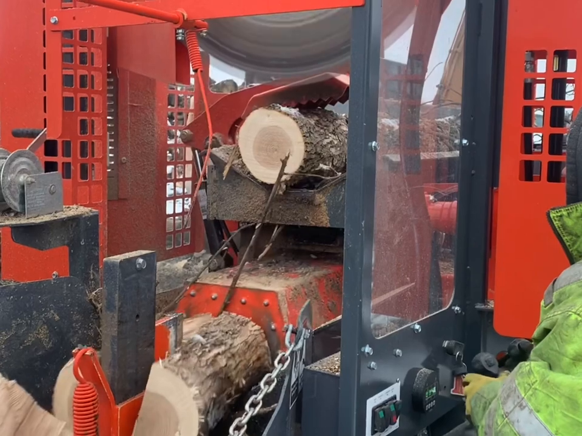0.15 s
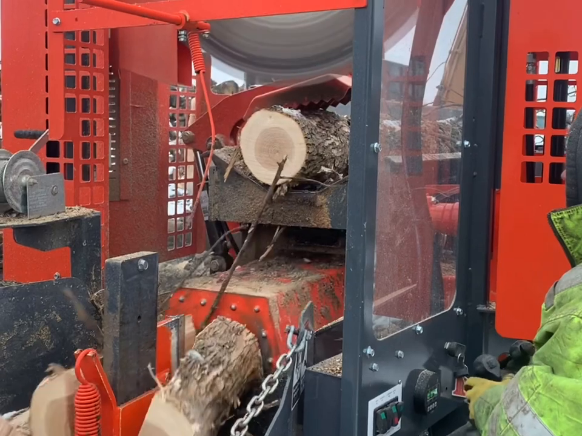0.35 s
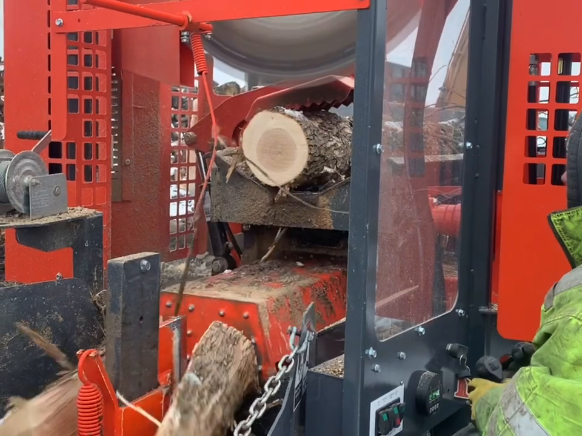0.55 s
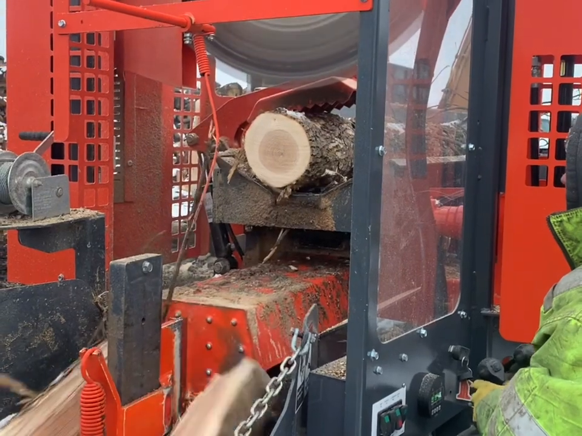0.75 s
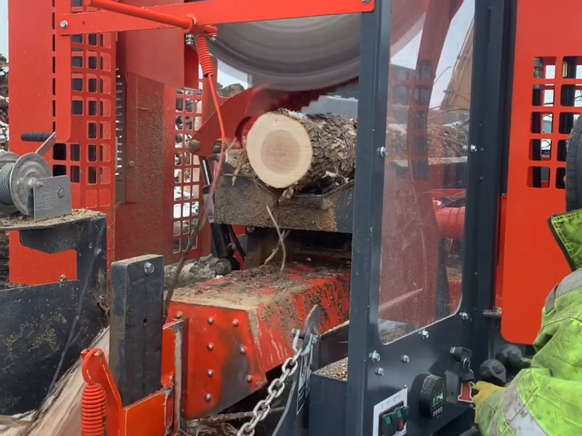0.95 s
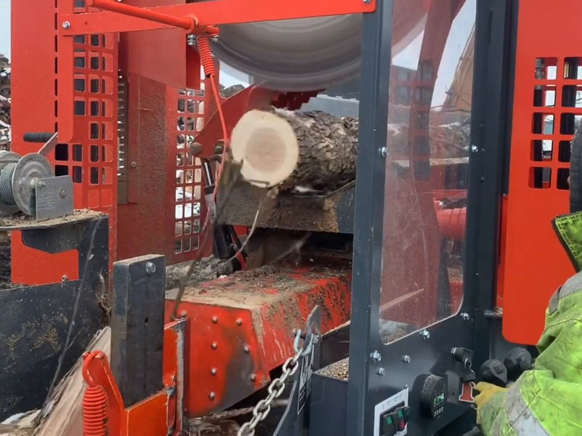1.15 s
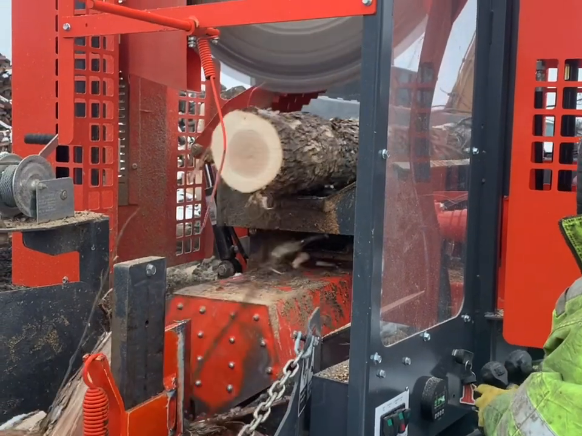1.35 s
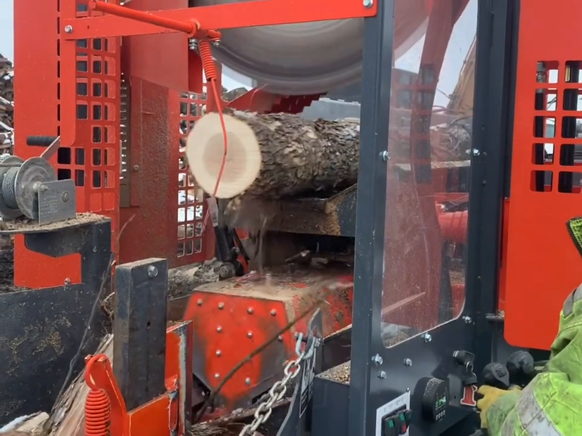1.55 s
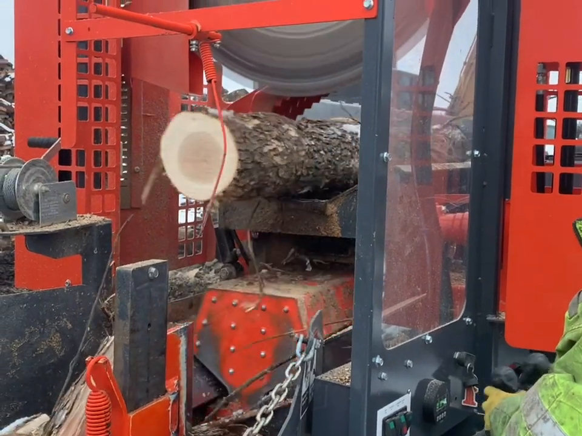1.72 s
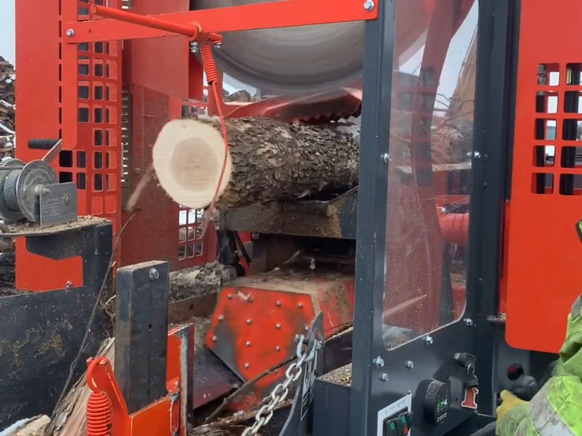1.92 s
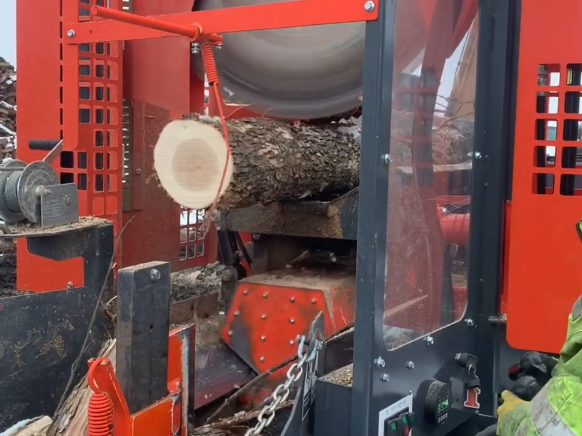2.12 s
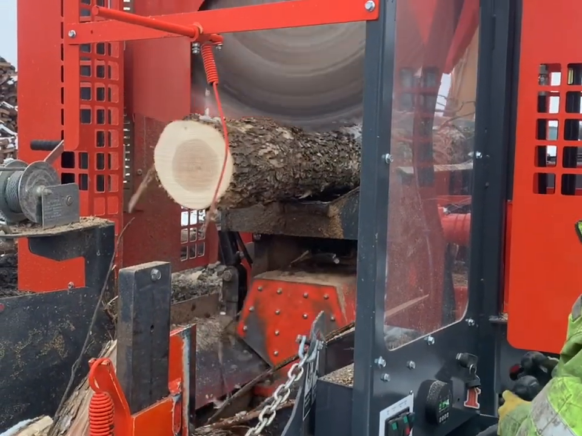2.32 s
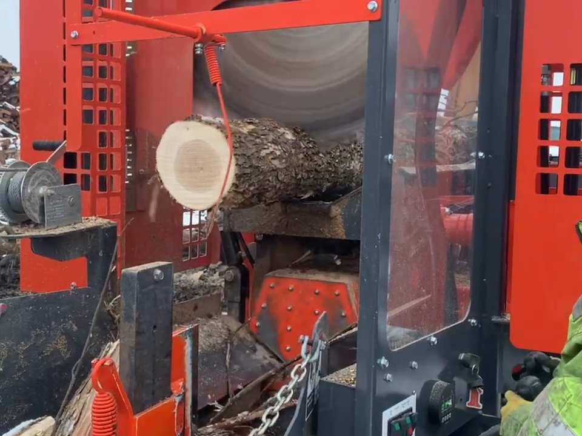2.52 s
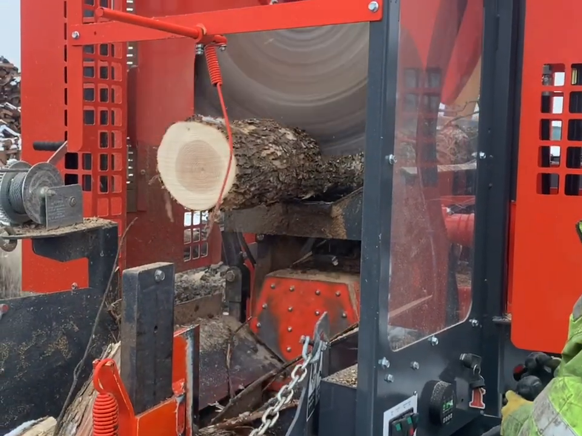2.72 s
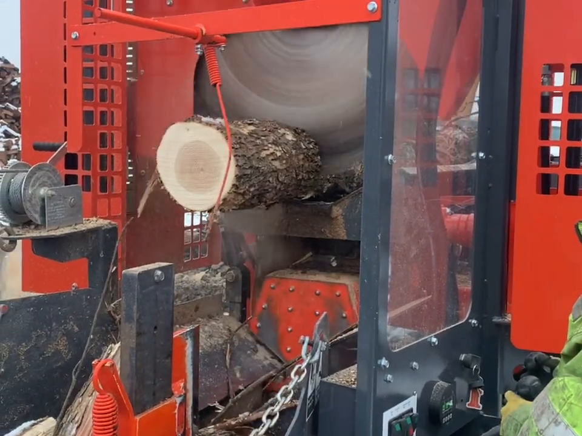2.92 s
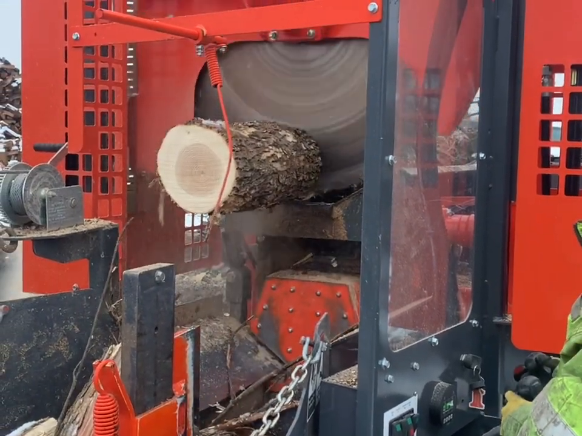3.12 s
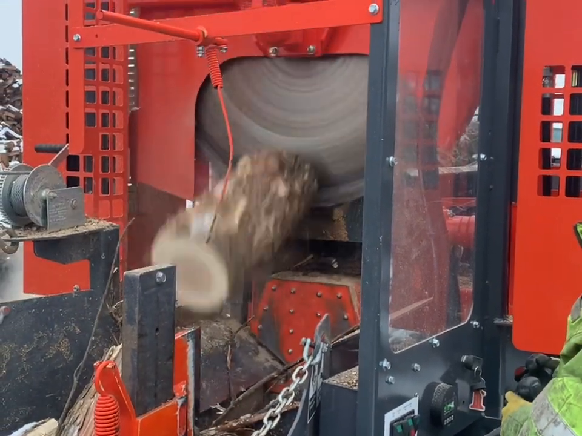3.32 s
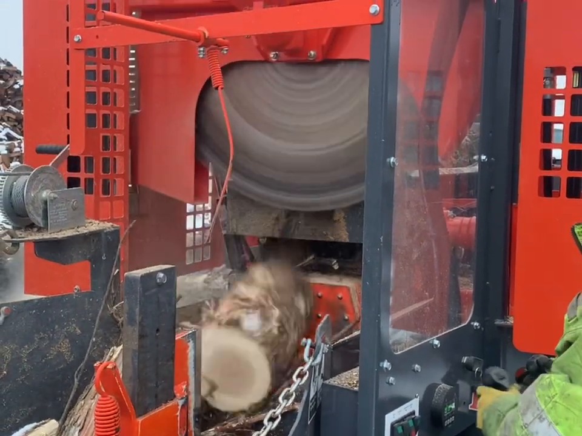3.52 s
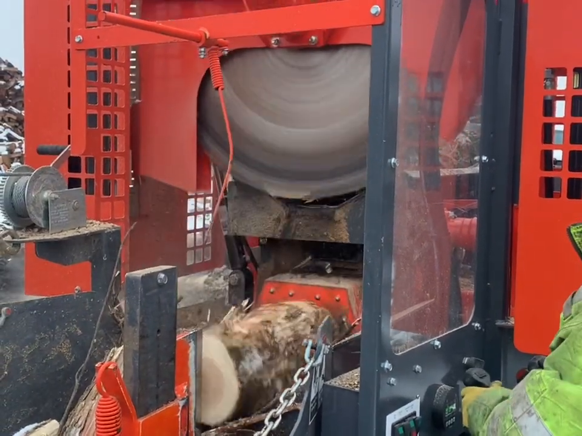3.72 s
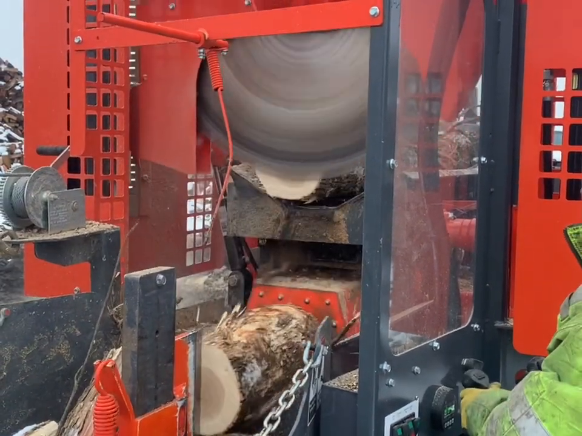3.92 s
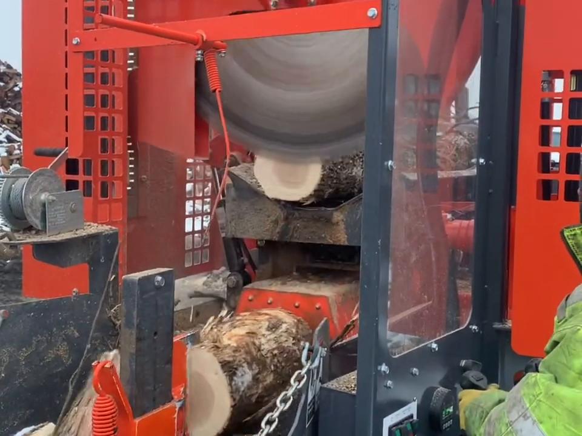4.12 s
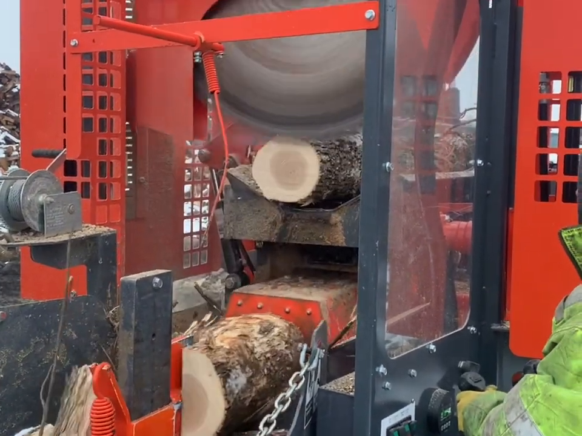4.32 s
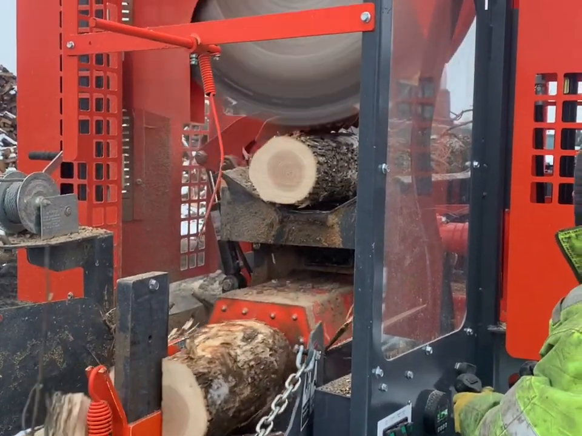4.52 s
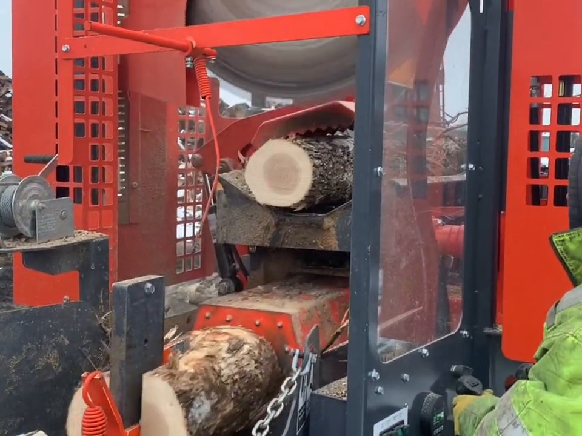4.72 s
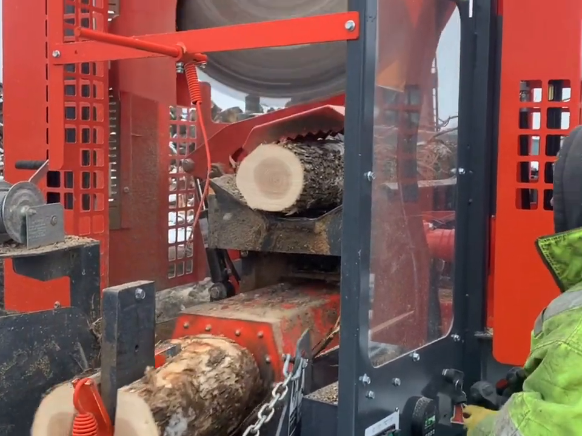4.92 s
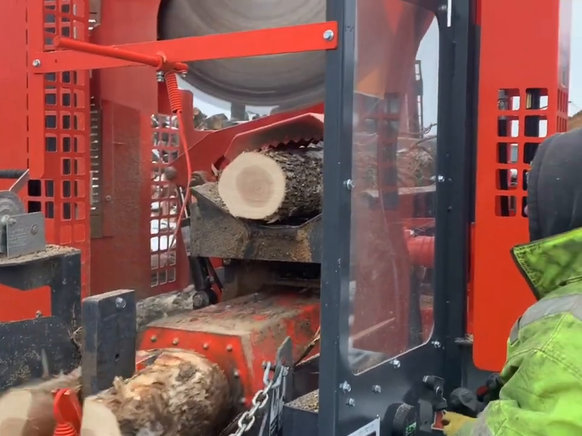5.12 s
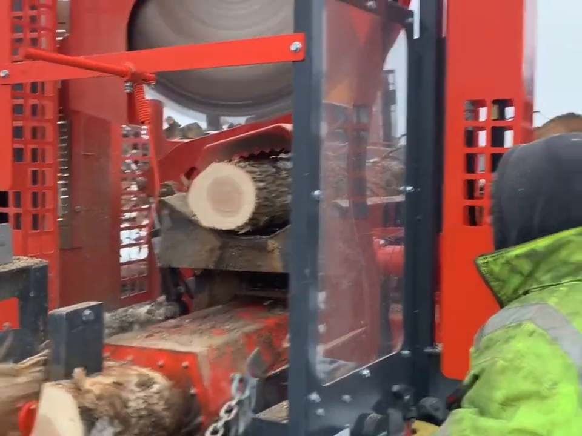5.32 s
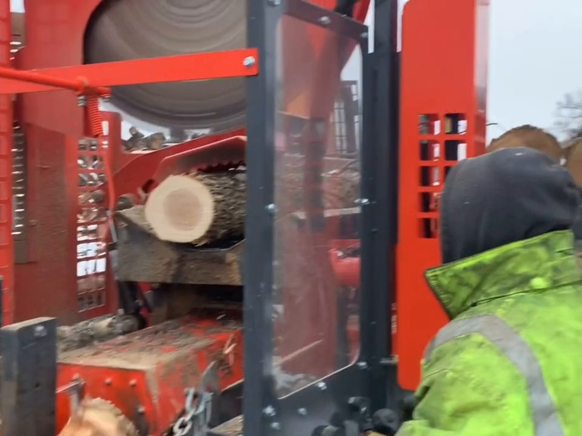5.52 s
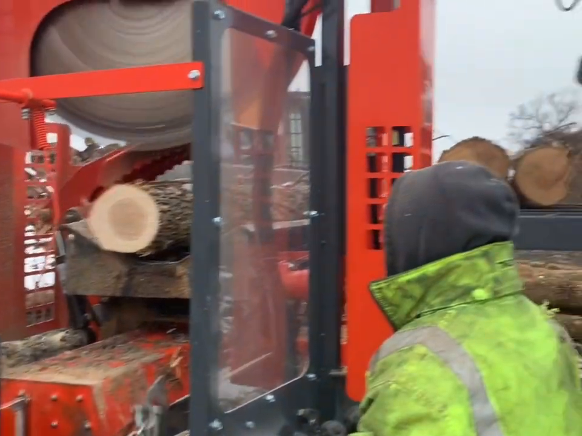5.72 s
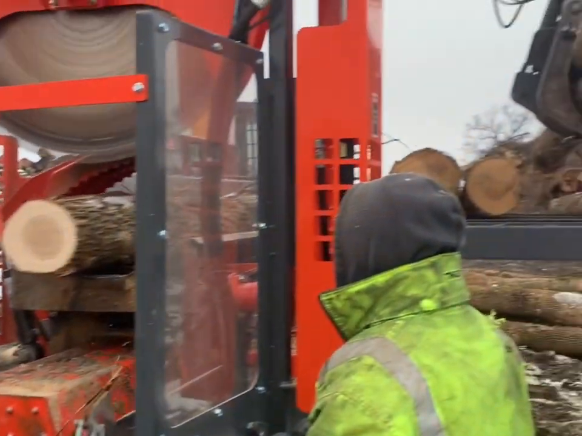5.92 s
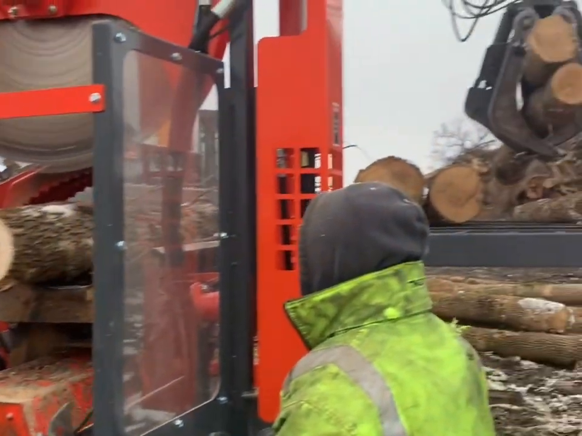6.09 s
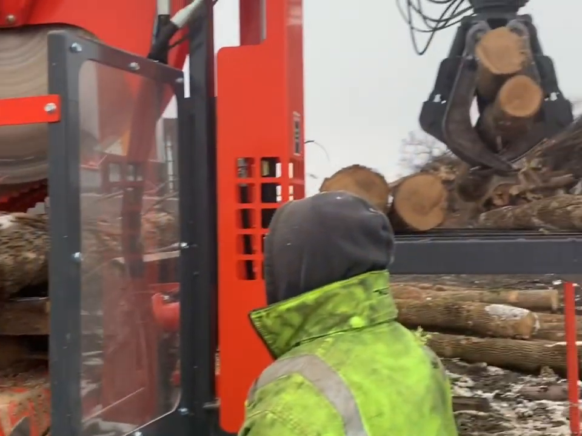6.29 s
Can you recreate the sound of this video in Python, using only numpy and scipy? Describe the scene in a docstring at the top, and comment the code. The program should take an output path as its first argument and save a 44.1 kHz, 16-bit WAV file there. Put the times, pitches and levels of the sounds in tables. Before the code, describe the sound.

A close stereo pickup of a wood-cutting machine outdoors: rough diesel roar, hiss, wavering pump tones and a blade motor's whine throughout. First a clanking bang and bark scrapes, then a one-second saw cut, bright and rasping with ringing blade tones, the engine sagging under load. After the breakthrough, the log drops with hard, ringing steel bangs, ticks and scrapes. The motor spins up again and wood tumbles with late thuds.

```python
"""A diesel engine drones and sags under load as it drives a firewood processor in an open yard: crank orders,
a pulsing noise roar, hiss and pump tones. A hydraulic motor whines as it spins a large circular blade, which
slows and rasps through one log as noise, torn-chip clicks and plate resonances. Logs and the ram bang on the
steel trough as noise contacts ringing modes; bark scrapes as short noise, links tick as noise cracks and squeak
as gliding tones. Two close microphone ports hear it all with a small delay between them."""
import sys
import numpy as np
from scipy import signal
from scipy.fft import rfft, irfft, next_fast_len
from scipy.io import wavfile

SR = 44100
rng = np.random.default_rng(int(sys.argv[2]) if len(sys.argv) > 2 else 0)


def store_wav(level_fs):
    """Save 16-bit WAV to argv[1]."""
    pcm = np.round(np.clip(np.atleast_2d(level_fs), -1, 1) * 32767)
    wavfile.write(sys.argv[1], SR, pcm.T.astype(np.int16))


N = 280035   # samples in the scene


def amp(db):
    """Decibels to gain."""
    return 10 ** (np.asarray(db) / 20)


def rms_one(x):
    """Scale to unit rms."""
    return x / np.sqrt(np.mean(x ** 2) + 1e-20)


def peak_one(x):
    """Scale to unit peak."""
    return x / np.abs(x).max()


def in_time(rows):
    """Table columns as curves over all samples; the first column is the time in seconds."""
    s, *columns = np.transpose(rows)
    return [np.interp(np.arange(N) / SR, s, column) for column in columns]


def at_hz(points, hz):
    """Read a spectrum table on a log frequency axis."""
    point_hz, point_db = np.array(points)[:, 0], np.array(points)[:, 1]
    return np.interp(np.log(hz), np.log(point_hz + 1), point_db)


def phase(hz):
    """Running phase in radians of a tone that follows a frequency curve."""
    return 2 * np.pi * np.cumsum(hz) / SR


def bell(s, spread):
    """A smooth swell around time s."""
    return np.exp(-((np.arange(N) / SR - s) / spread) ** 2)


def drift(rate_hz):
    """Random wander of spread 1: noise through two equal poles at rate_hz, drawn at every 40th sample."""
    r = np.exp(-80 * np.pi * rate_hz / SR)
    noise = rng.standard_normal(N // 40 + 2002)
    slow = signal.lfilter([1], [1, -2 * r, r * r], noise)[2000:]   # drop the filter's start-up
    return np.interp(np.arange(N) / 40, np.arange(len(slow)), rms_one(slow))


def resonance(x, hz, width_hz):
    """Two-pole band-pass with gain 1 on top."""
    r = np.exp(-np.pi * width_hz / SR)
    zeros = np.array([1, 0, -1]) * (1 - r * r) / 2
    poles = [1, -2 * r * np.cos(2 * np.pi * hz / SR), r * r]
    return signal.lfilter(zeros, poles, x)


def coloured(spectrum, patchy_db, shared_db):
    """Noise of the given spectrum, cut into half-octave bands that flicker alone and together; rms 1."""
    size = next_fast_len(N)
    hz = np.fft.rfftfreq(size, 1 / SR) + 1
    shaped = rfft(rng.standard_normal(size)) * amp(at_hz(spectrum, hz))
    band = np.floor(2 * np.log2(np.clip(hz, spectrum[0][0], spectrum[-1][0])))
    bands = (irfft(shaped * (band == k), size)[:N] * amp(patchy_db * drift(4.3)) for k in np.unique(band))
    return rms_one(sum(bands) * amp(shared_db * drift(8.7)))


def swell(rise_ms, fall_ms, hold_ms=0):
    """A smooth rise, a hold and an exponential fall with time constant fall_ms."""
    rise, hold, fall = (max(ms, 0) * SR / 1000 + 2 for ms in (rise_ms, hold_ms, fall_ms))
    up = np.sin(np.linspace(0, np.pi / 2, int(rise))) ** 2
    down = np.exp(-np.arange(int(6 * fall)) / fall)
    return np.concatenate([up, np.ones(int(hold)), down])


def add(out, s, piece):
    """Mix a piece in at time s."""
    i = max(int(s * SR), 0)
    out[i:i + len(piece)] += piece[:N - i]


def struck(rough, modes):
    """A rough contact rings every mode with a strength of its own; peak 1."""
    rings = (amp(db + rng.normal(0, 0.63)) * rms_one(resonance(rough, hz, 0.58 / ring_s))
             for hz, db, ring_s in modes)
    return peak_one(sum(rings))


# The engine sagging under the hydraulic load. Each row: time in seconds, half crank speed in Hz,
# order reference level in dB rms, roar level in dB rms.
ENGINE_RUN = [(0, 21.84, -41.5, -31.5), (.7, 21.83, -38, -30.5), (1.5, 21.76, -40, -30),
              (1.9, 21.75, -37.5, -29), (2.5, 20.99, -32, -32), (2.9, 21.21, -40, -32),
              (3.1, 20.83, -41.5, -30), (3.35, 20.64, -46, -33), (3.47, 20.68, -40, -33.5),
              (3.55, 20.52, -33.5, -34.5), (3.85, 20.31, -38, -29.5), (4.1, 20.34, -34.5, -30),
              (4.35, 21.2, -38, -30.5), (4.7, 21.85, -40, -32), (5.4, 21.85, -36, -30),
              (6.35, 21.6, -38.5, -31)]
# Engine orders. Each row: multiple of half crank speed, level in dB re the reference.
CRANK_ORDERS = [(2, -21), (3, 3), (4, -6), (5, -9.5), (6, -18.5), (7, -8), (9, -14.5), (10, -3), (12, -13)]
# Colour of the roar. Each row: frequency in Hz, density in dB per Hz.
ROAR_SPECTRUM = [(25, -32), (45, -3), (70, -3.5), (120, 3.5), (220, -3.5), (400, -11), (600, -8),
                 (800, -13), (1000, -4.5), (1350, -4), (2000, -12), (2350, -15), (2700, -25.5), (4000, -45)]
# Colour of the fan and valve hiss. Each row: frequency in Hz, density in dB per Hz.
HISS_SPECTRUM = [(1500, -6), (2700, 1.5), (3300, 0), (4700, 0), (5500, -1.3), (6300, -1), (7200, -3.6),
                 (8000, -5.7), (10300, -7.8), (11000, -11), (13500, -14.5), (16000, -18.5)]
# Steady narrow hums of the housing. Each row: frequency in Hz, width in Hz of each of two passes, level in dB rms.
HOUSING_HUMS = [(938, 20.4, -44.5)]
HISS_DB, HISS_FOLLOWS = -39.5, 1   # rms at the roar's mean level; share of the roar's dB swing it follows


def engine():
    """Orders of the crank, each wavering in level, over a roar that pulses with the firing, hums and a hiss."""
    half_crank_hz, tone_db, roar_db = in_time(ENGINE_RUN)
    turn = phase(half_crank_hz)
    orders = sum(amp(db + 2.5 * drift(5.5)) * np.sin(k * turn + 2 * np.pi * rng.random())
                 for k, db in CRANK_ORDERS)
    tones = np.sqrt(2) * amp(tone_db) * orders
    firing = 1 + 0.073 * np.cos(3 * turn)
    roar = amp(roar_db) * firing * coloured(ROAR_SPECTRUM, patchy_db=.9, shared_db=.5)
    hiss_db = HISS_DB + HISS_FOLLOWS * (roar_db - roar_db.mean())
    hiss = amp(hiss_db) * coloured(HISS_SPECTRUM, patchy_db=1.27, shared_db=1.1)
    hums = sum(amp(db) * rms_one(resonance(resonance(rng.standard_normal(N), hz, width), hz, width))
               for hz, width, db in HOUSING_HUMS)
    return tones + hums + roar + hiss


# Pump tones geared to the engine. A plain list of multiples of half crank speed.
PUMP_MULTIPLES = [24, 28, 32, 60]
# The pumps as the valves load them. Each row: time in seconds, then the level of each pump tone in dB rms.
PUMP_LEVELS = [(0, -43.5, -38, -50, -47), (.7, -41.5, -76, -85, -52), (1.2, -45.5, -54, -56, -42),
               (1.5, -60, -48, -54, -45.5), (2.2, -42, -50, -42.5, -62), (2.5, -45, -40, -46, -60),
               (2.9, -43, -43, -51, -51), (3.4, -57, -45, -46, -42), (3.6, -39.5, -46, -64, -78),
               (4.1, -40, -70, -62, -61), (4.4, -42, -39, -58, -48), (4.9, -46, -50, -47, -49),
               (5.4, -44.5, -63, -55, -55), (5.9, -44, -64, -62, -41), (6.35, -59, -59, -46, -43)]
# Two hums that come and go, nearly holding their pitch. Each row: time in seconds, low hum in Hz, its level
# in dB rms, high hum in Hz, its level in dB rms.
FREE_HUMS = [(0, 327, -42, 808, -48), (.7, 327.6, -50.5, 810, -81), (1.5, 321.3, -46, 782, -58),
             (2.2, 320.5, -44.5, 790, -56), (2.45, 327.2, -55, 802, -45), (2.85, 325, -48, 780, -47),
             (3.2, 325.5, -62, 784, -62), (3.5, 319, -43, 776, -61), (3.8, 315, -68, 798, -69),
             (4.2, 320, -53, 800, -51), (4.6, 325.4, -43.5, 790, -49), (5.2, 327.5, -43, 791.6, -62),
             (6.35, 325.8, -46.5, 805, -53)]


def pumps():
    """Clean tones locked to the crank, and two free hums, all wavering a little in level and phase."""
    turn = phase(in_time(ENGINE_RUN)[0])
    low_hz, low_db, high_hz, high_db = in_time(FREE_HUMS)
    turns = [k * turn for k in PUMP_MULTIPLES] + [phase(low_hz), phase(high_hz)]
    levels = in_time(PUMP_LEVELS) + [low_db, high_db]
    tones = (amp(db + 1.9 * drift(8.0)) * np.sin(angle + 0.62 * drift(9.5)) for angle, db in zip(turns, levels))
    return np.sqrt(2) * sum(tones)


# The blade motor, dragged down by the cut and spinning up again. Each row: time in seconds, whine in Hz,
# whine peak level in dB.
MOTOR_RUN = [(0, 646, -40), (1.0, 655, -42.5), (1.4, 646, -43), (2.15, 640.5, -39), (2.3, 631, -41),
             (2.5, 604, -38), (2.6, 572, -35), (2.7, 551, -35), (2.8, 533, -37), (2.95, 512, -43),
             (3.1, 504.5, -44), (3.35, 525, -46), (3.7, 568, -42), (3.9, 593, -42), (4.2, 603, -41),
             (4.5, 622, -39), (4.9, 641.4, -38), (5.3, 654, -40), (6.35, 652, -41)]
# Overtones of the whine when idle. Each row: multiple of the whine, level in dB re the whine.
WHINE_OVERTONES = [(2, -7.5), (3, -9), (4, -15)]
# The groan swelling when the motor labours. Each row: centre in seconds, peak level in dB, spread in seconds.
GROAN_SWELLS = [(.6, -80, .2), (2.42, -27, 0.14), (2.75, -29.5, 0.073), (3.11, -26, 0.15),
                (5.601, -73, 0.18)]
GROAN_IDLE_DB = -59   # peak of the groan that is always there
TEETH_DB, TEETH_S, TEETH_SPREAD_S = 8, 2.78, .12   # overtones added deep in the wood, dB re their idle level


def blade_motor():
    """The motor whines with overtones that swell in the wood, and groans at a third of the whine."""
    whine_hz, whine_db = in_time(MOTOR_RUN)
    turn = phase(whine_hz)
    fundamental = amp(2.6 * drift(8.2)) * np.sin(turn + 0.45 * drift(12.0))
    overtones = sum(amp(db + 1.5 * drift(8.9)) * np.sin(k * turn + 0.68 * drift(8.1))
                    for k, db in WHINE_OVERTONES)
    deep_swell = 1 + amp(TEETH_DB) * bell(TEETH_S, TEETH_SPREAD_S)
    whine = amp(whine_db) * (fundamental + deep_swell * overtones)
    labour = amp(GROAN_IDLE_DB) + sum(amp(db) * bell(s, spread) for s, db, spread in GROAN_SWELLS)
    groan = labour * amp(0.61 * drift(26.0)) * np.sin(turn / 3 + .5 * drift(7.1))
    return whine + groan


# Squeaks, and one longer faint plate tone near 1200 Hz just after the cut. Each row: centre in seconds,
# start pitch in Hz, end pitch in Hz, peak level in dB, length in ms.
TONE_GLIDES = [(0.024, 4860, 4680, -22, 47), (1.075, 6470, 6500, -25, 9.3), (1.222, 6300, 6320, -38, 18),
               (1.348, 6400, 6560, -31, 18), (1.636, 6300, 6300, -31, 10), (3.23, 1205, 1200, -32, 104),
               (4.715, 9360, 10580, -34, 25), (5.624, 6100, 6150, -32, 35.2), (6.17, 4822, 4974, -31, 35),
               (6.193, 4900, 4900, -32, 21)]
OCTAVE_DB = -16   # octave above, re the tone


def squeaks_and_plate_tone():
    """Squeaks, and one longer faint plate tone: a gliding sine and its octave under a rounded window."""
    out = np.zeros(N)
    for s, start_hz, end_hz, db, ms in TONE_GLIDES:
        turn = phase(np.linspace(start_hz, end_hz, int(ms * SR / 1000)))
        tone = np.sin(turn) + amp(OCTAVE_DB) * np.sin(2 * turn)
        add(out, s - len(turn) / SR / 2, amp(db) * np.hanning(len(turn)) * tone)
    return out


# Bark and chips scraping steel. Each row: start in seconds, level on top in dB rms, rise plus fall time
# constant in ms, centre in Hz.
BARK_SCRAPES = [(.45, -37, 19, 6360), (0.819, -31.5, 51, 4470), (.96, -39, 41, 6600),
                (1.215, -33, 32, 6430), (1.535, -32.5, 26, 5900), (1.786, -27.5, 27, 5000),
                (1.895, -35.5, 40, 4500), (3.242, -33, 31, 4430), (3.335, -29, 19, 7000),
                (3.441, -40, 41, 7950), (3.524, -34.5, 77, 4870), (3.62, -39, 24, 8060),
                (3.651, -37, 13, 8000), (3.746, -31, 51, 6550), (4, -32, 60, 7640), (4.119, -30, 62, 8510),
                (4.199, -32, 24, 7980), (4.247, -29, 23, 8200), (5.677, -35.5, 59, 5930),
                (5.731, -38, 150, 4440), (5.801, -35.5, 41, 4493)]
SCRAPE_RISE_SHARE = 0.3


def scrapes():
    """Friction on steel as swelling broad noise around a centre pitch."""
    out = np.zeros(N)
    for s, db, ms, hz in BARK_SCRAPES:
        shape = swell(SCRAPE_RISE_SHARE * ms, (1 - SCRAPE_RISE_SHARE) * ms)
        noise = rms_one(resonance(rng.standard_normal(len(shape)), hz, 0.5 * hz))
        add(out, s, amp(db) * shape * noise)
    return out


# Dry ticks of the links. Each row: start in seconds, level on top in dB rms.
LINK_TICKS = [(0.527, -23), (1.4754, -31), (1.838, -23), (4.027, -21), (4.187, -16), (4.3802, -42),
              (4.564, -30), (4.609, -27.5), (4.7593, -33), (5.0539, -30), (5.1693, -35), (6.154, -30)]


def ticks():
    """Short cracks of very broad noise with a fast fall."""
    out = np.zeros(N)
    for s, db in LINK_TICKS:
        shape = swell(0.36, 2.4)
        noise = rms_one(resonance(rng.standard_normal(len(shape)), 4700, 6700))
        add(out, s, amp(db) * shape * noise)
    return out


# Logs thudding on the frame. Each row: start in seconds, peak level in dB, pitch in Hz.
FRAME_THUDS = [(0.547, -30, 99), (0.709, -15.5, 258), (0.735, -15.5, 95), (0.776, -18.5, 236),
               (0.863, -19, 233), (1.116, -20, 103), (1.868, -18.5, 139), (2.182, -16, 81.4),
               (2.374, -14, 120), (2.436, -12, 169), (2.613, -17, 213), (3.368, -16.5, 158),
               (3.535, -21.5, 91.5), (3.881, -14, 209), (3.914, -13, 244), (4.215, -19.5, 217),
               (4.277, -20, 89), (4.661, -19, 117), (4.648, -21.5, 213), (5.358, -14, 243),
               (5.64, -13, 234.4), (5.653, -12, 216), (5.664, -12, 105), (5.685, -28, 153),
               (5.708, -16, 110), (5.729, -20, 126), (5.744, -15, 140), (5.782, -15, 130),
               (5.817, -18, 105), (5.885, -23, 78.17), (6.305, -19, 79.4)]
THUD_RISE_MS, THUD_HOLD_MS, THUD_FALL_MS = 3.5, 7, 18


def thuds():
    """Each soft contact sounds one low sine and a wide noise band around it."""
    out = np.zeros(N)
    for s, db, hz in FRAME_THUDS:
        contact = np.pad(swell(THUD_RISE_MS, THUD_FALL_MS, THUD_HOLD_MS), (0, SR // 20))
        tone = np.sin(2 * np.pi * hz * np.arange(len(contact)) / SR)
        noise = 3.27 * resonance(rng.standard_normal(len(contact)), hz, 1.12 * hz)
        add(out, s, amp(db) * peak_one(contact * (tone + noise)))
    return out


# Bangs of logs on the steel trough. Each row: start in seconds, log body peak in dB, trough ring peak in dB,
# guard plate ring peak in dB, crack peak in dB, crack centre in Hz, rise in ms, contact after the rise in ms.
TROUGH_BANGS = [(0.703, -22, -10, -29, -29, 3000, 4.4, 9), (.712, -16, -7, -21, -31, 3000, 3.2, 6.7),
                (0.722, -17.5, -13, -16.5, -23, 3500, 3, 7.8), (.732, -25, -22, -21, -33, 2500, 3, 10.2),
                (2.435, -14.5, -21, -48, -15.5, 2030, 7.1, 31), (3.373, -19, -38, -49, -50, 2500, 9.4, 14),
                (3.53, -22.5, -43, -48, -38, 2500, 5.7, 26), (3.765, -26, -16, -26, -21, 2480, 9, 40),
                (3.879, -16, -5, -8, -13.5, 5000, 2.17, 5), (3.888, -20, -1.5, -6, -19, 4500, 2, 4.2),
                (3.8962, -17, -7, -20, -11, 3000, 2.46, 3.26), (3.905, -25, -32, -30, -17, 4270, 4.5, 49),
                (4.182, -25, -22, -16.5, -12.5, 6800, 5.9, 4.7),
                (4.214, -30, -16, -27, -19, 2200, 2.7, 8.2), (4.276, -21.5, -14.5, -22, -12, 1988, 0.58, 5),
                (4.292, -23, -29, -31, -21, 2200, 3.2, 18), (4.65, -29, -44, -48, -47, 2500, 7.7, 51),
                (5.351, -14, -13, -30, -29, 2000, 2.2, 7), (5.36, -14.5, -9.5, -7.5, -22, 3500, 1.4, 9),
                (5.369, -16.5, -14.5, -10.5, -27, 3473, 2.5, 16),
                (5.653, -20, -44, -14.5, -16, 6100, 2.65, 27.5),
                (5.739, -36, -39, -26.5, -33, 3520, 7.7, 61), (5.912, -35, -23.5, -30, -26, 6300, 3.5, 27)]
# Modes of the log body. Each row: frequency in Hz, relative level in dB, time in seconds to ring down by 16 dB.
LOG_MODES = [(257, 3, 0.038), (350, -3, 0.05), (444, -6, 0.05), (530, -4, .04), (605, 1.5, 0.023),
             (655, 2, 0.05), (782, -5, 0.04), (900, -6, .03)]
# Modes of the trough. Each row: frequency in Hz, relative level in dB, time in seconds to ring down by 16 dB.
TROUGH_MODES = [(1100, 4.5, 0.028), (1179, 6, 0.013), (1297, 8, 0.0082), (1605, -7, 0.024),
                (1720, -2, 0.01), (1860, -5.5, 0.022), (2210, -5, 0.073)]
# Modes of the guard plates. Each row: frequency in Hz, relative level in dB, time in seconds to ring down by 16 dB.
GUARD_MODES = [(2600, -5, .006), (2950, -3, .007), (3270, 1, .011), (3470, 3, .012), (3800, -4, .007),
               (4100, -2, .008), (4400, -4, .007), (4750, -1, .007), (5300, -8, .006), (5800, -6, .007)]
BANG_HOLD_SHARE = .48   # share of the contact that holds; the rest is the time constant of its fall


def bangs():
    """A chattering contact rings the modes of log, trough and guard plates and cracks broadly."""
    out = np.zeros(N)
    for s, log_db, ring_db, guard_db, crack_db, hz, rise, ms in TROUGH_BANGS:
        contact = np.pad(swell(rise, (1 - BANG_HOLD_SHARE) * ms, BANG_HOLD_SHARE * ms), (0, SR // 20))
        rough = contact * rng.standard_normal((4, len(contact)))
        # a fast touch adds a sharp click at the end of the rise
        rough[:, int(rise * SR / 1000)] += 9 / (1 + (rise / 3) ** 2)
        # the contact chatters: a new random level every 90 samples
        chatter = np.repeat(rng.standard_normal(len(contact) // 90 + 1), 90)[:len(contact)]
        rough *= amp(2.3 * chatter)
        log = amp(log_db) * struck(rough[0], LOG_MODES)
        trough = amp(ring_db) * struck(rough[1], TROUGH_MODES)
        guard = amp(guard_db) * struck(rough[3], GUARD_MODES)
        crack = amp(crack_db) * peak_one(resonance(resonance(rough[2], hz, 0.34 * hz), hz, 8.3 * hz))
        add(out, s, log + trough + guard + crack)
    return out


# Split wood tumbling on after a bang. Each row: start in seconds, wood peak level in dB, fall time constant
# in ms, trough and rattle level in dB re the wood.
WOOD_TUMBLES = [(.74, -26, 100, -8), (3.92, -23, 48, -23), (4.288, -23.5, 38, 0), (5.385, -17.5, 34, -11.5),
                (5.675, -25, 143, 1)]
KNOCKS_PER_S, KNOCK_MS = 260, 2.5   # mean rate of random knocks; fall time constant of each


def tumbling():
    """Uneven random knocks, fading away, ring the wood, the trough and the guards and rattle broadly."""
    out = np.zeros(N)
    for s, db, ms, trough_db in WOOD_TUMBLES:
        shape = swell(8.0, ms)
        chance, strength = rng.random((2, len(shape)))
        hits = (chance < KNOCKS_PER_S / SR) * (0.2 + strength) + 0.003   # over a faint steady rub
        knocks = np.convolve(hits, swell(0.54, KNOCK_MS))[:len(shape)]
        rough = shape * knocks * rng.standard_normal((3, len(shape)))
        wood = struck(rough[0], LOG_MODES)
        trough = struck(rough[1], TROUGH_MODES)
        broad = amp(-0.5) * peak_one(resonance(rough[2], 2600, 2500))
        rattle = broad + amp(-4.5) * struck(rough[2], GUARD_MODES)
        add(out, s, amp(db) * (wood + amp(trough_db) * (trough + rattle)))
    return out


CUT_IN_S, CUT_OUT_S = 2.161, 3.118   # teeth touch the log, break through
BITE_S, CLEAR_S = 0.093, 0.14   # rise to full depth, fade after breaking through
TOUCH_SHARE, TOUCH_S = 0.22, 0.0042   # the first teeth quickly reach this share of full depth


def in_wood(sag_db_per_s, out_s):
    """Gain of the cut: bites in, sags steadily, clears after out_s."""
    t = np.arange(N) / SR
    touch = np.clip((t - CUT_IN_S) / TOUCH_S, 0, 1)
    deepen = np.clip((t - CUT_IN_S) / BITE_S, 0, 1)
    bite = TOUCH_SHARE * touch + (1 - TOUCH_SHARE) * deepen
    clear = np.clip(1 - (t - out_s) / CLEAR_S, 0, 1)
    return bite * clear ** 2 * amp(-sag_db_per_s * (t - CUT_IN_S - BITE_S))


CHIPS_PER_S, CHIPS_DB = 1400, -13   # mean rate of random clicks; level re the rasp noise


def chips():
    """Chips torn out at random crackle as uneven clicks in a broad mid band; rms 1."""
    strength = amp(2.9 * np.minimum(rng.exponential(1, N), 4))
    torn = (rng.random(N) < CHIPS_PER_S / SR) * strength * rng.choice([-1, 1], N)
    return rms_one(resonance(resonance(torn, 3600, 5000), 4000, 7000))


# Colour of the rasp. Each row: frequency in Hz, density in dB per Hz.
RASP_SPECTRUM = [(300, -14), (1200, -8), (2000, -5), (2700, -5), (3300, -7), (4000, -4.5), (5500, 0),
                 (7200, -1.5), (8800, -1.8), (10300, -4.6), (11000, -7.5), (13500, -12.5), (16000, -16.5)]
# High rings of the blade in the rasp. Each row: frequency in Hz, width in Hz, level in dB re the rasp noise.
BLADE_SING = [(3690, 160, -20), (4440, 170, -28), (5540, 120, -15), (6160, 160, -18), (6850, 160, -18),
              (8170, 200, -18)]
RASP_DB, RASP_SAG_DB_PER_S = -17, 7.5   # rms of the noise at full depth before flutter; fading as the blade slows
FLUTTER_DB, FLUTTER_HZ = 1.5, 110   # spread and rate of the flutter as the teeth grab unevenly


def rasp():
    """Teeth in the wood: fluttering coloured noise, crackling chips and high rings of the blade."""
    teeth = rng.standard_normal(N)
    sing = sum(amp(db + 2.5 * drift(6.1)) * rms_one(resonance(teeth, hz, width)) for hz, width, db in BLADE_SING)
    noise = coloured(RASP_SPECTRUM, patchy_db=-0.45, shared_db=1.5) * amp(FLUTTER_DB * drift(FLUTTER_HZ))
    return amp(RASP_DB) * in_wood(RASP_SAG_DB_PER_S, CUT_OUT_S) * (noise + amp(CHIPS_DB) * chips() + sing)


# Blade plate resonances, each loudest at some depth of the cut. Each row: frequency in Hz at top speed,
# rate of its random wander in Hz, relative level in dB, centre in seconds, spread in seconds.
PLATE_MODES = [(1017, 4, 10, 2.32, .08), (1140, 26, 1, 2.69, 0.45), (1370, 15, 7.5, 2.66, 0.37),
               (1446, 3.7, 11, 2.31, 0.071), (1457, 3.3, 4, 2.83, .2), (1600, 7.3, 10, 2.4, 0.072),
               (1560, 3.3, 8, 2.86, 0.088), (1670, 5.6, 10, 3.08, 0.071), (2850, 23, 5, 3, 0.32),
               (1950, 15, 8, 2.11, 0.06), (2050, 8.5, 3, 2.94, 0.26), (2263, 26, 4.5, 2.57, .3)]
RING_DB, RING_SAG_DB_PER_S, RING_ON_S = -37, 9, 0.044   # level before the cut's gain; sag; how much longer it lasts
PLATE_SAG_SHARE = .12   # the plate slackens as it slows: share of the speed loss that its pitches follow


def plate_ring():
    """The cut shakes the plate: narrow wandering tones swell in turn and sag in pitch with the blade."""
    motor_hz = in_time(MOTOR_RUN)[0]
    slack = phase(1 + PLATE_SAG_SHARE * (motor_hz / motor_hz.max() - 1))
    ring = 0
    for hz, width, db, s, spread in PLATE_MODES:
        # two random envelopes in quadrature make a narrow band of noise
        tone = drift(width) * np.cos(hz * slack) + drift(width) * np.sin(hz * slack)
        ring = ring + amp(db + 1.6 * drift(7)) * bell(s, spread) * tone
    return amp(RING_DB) * in_wood(RING_SAG_DB_PER_S, CUT_OUT_S + RING_ON_S) * rms_one(ring)


# Lead of the left port up to the first half turn. Each row: frequency in Hz, lead in radians.
PORT_LEAD = [(0, 0), (130, -.12), (430, -.7), (860, 0), (1120, -.35), (1640, .1), (2240, 1.9), (3450, 1.55),
             (4100, 2.2), (4350, 3.0), (4600, 3.14)]
# Level tilt between the ports. Each row: frequency in Hz, left minus right in dB.
PORT_TILT = [(60, 0), (250, .6), (600, -2), (900, -1), (1700, -5), (2400, -1), (3000, 0), (16000, 0)]
# Reflections that differ between the ports. Each row: frequency in Hz, level in dB re the direct sound.
PORT_SCATTER = [(60, -32), (250, -18), (600, -12.5), (1200, -14.5), (2300, -8), (3800, -11), (4700, -24),
                (5500, -12), (16000, -12)]
# above the table the lead grows by a half turn per step, as from a small delay, with a ripple in each step
HALF_TURN_HZ, LEAD_RIPPLE = 2165, .8


def ports(x):
    """One port leads by a small delay and differs in level; shifting frame reflections arrive with opposite sign."""
    size = next_fast_len(N + SR // 10)
    hz = np.fft.rfftfreq(size, 1 / SR) + 1
    steps = np.pi * np.maximum(hz - PORT_LEAD[-1][0], 0) / HALF_TURN_HZ
    lead = np.interp(hz, *np.transpose(PORT_LEAD)) + steps - LEAD_RIPPLE / 2 * np.sin(2 * steps)
    half = np.exp(.5j * lead) * amp(at_hz(PORT_TILT, hz) / 2)   # each port takes half of the lead and the tilt
    echoes = rng.standard_normal(SR // 20) * np.exp(-np.arange(SR // 20) / (0.014 * SR))
    echo_response = rfft(echoes / np.linalg.norm(echoes), size)
    direct = rfft(x, size)
    unlike = rfft(x * drift(13.2), size) * echo_response * amp(at_hz(PORT_SCATTER, hz))
    left, right = half * (direct + unlike), (direct - unlike) / half
    return irfft(np.array([left, right]), size)[:, :N]


def scene():
    """All sources, heard through the two ports."""
    machine = engine() + pumps() + blade_motor()
    handling = squeaks_and_plate_tone() + scrapes() + ticks() + thuds() + bangs() + tumbling()
    cut = rasp() + plate_ring()
    return ports(machine + handling + cut)


CUTOFF_HZ = 15730


def record(dry):
    """The microphones lose the deepest bass, peaks are rounded and the top is cut steeply."""
    bass_cut = signal.sosfilt(signal.butter(2, 45, "high", fs=SR, output="sos"), dry)
    rounded = 1.3 * np.tanh(bass_cut / 1.3)
    return signal.sosfilt(signal.ellip(12, .5, 70, CUTOFF_HZ, fs=SR, output="sos"), rounded)


dry = scene()
out = record(dry)
store_wav(out)
```